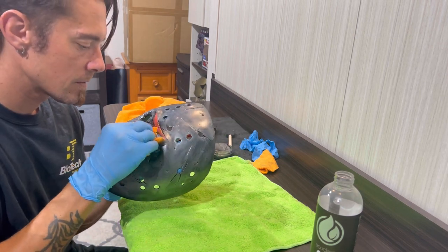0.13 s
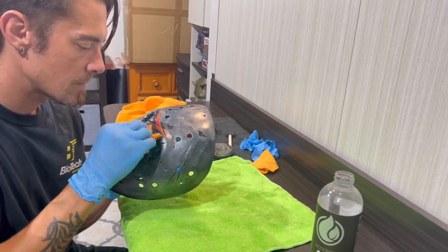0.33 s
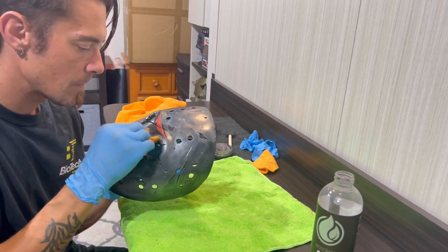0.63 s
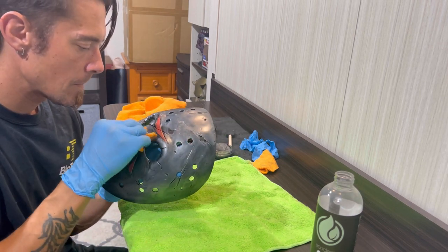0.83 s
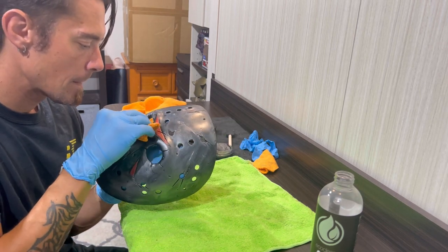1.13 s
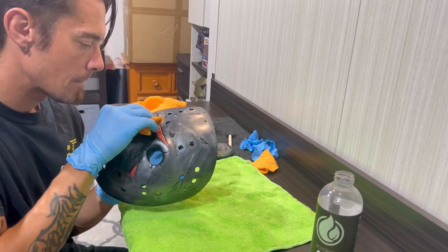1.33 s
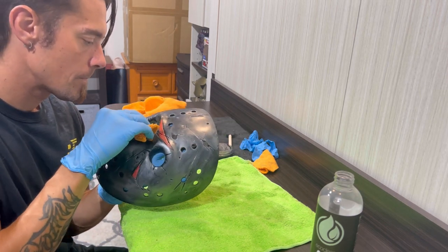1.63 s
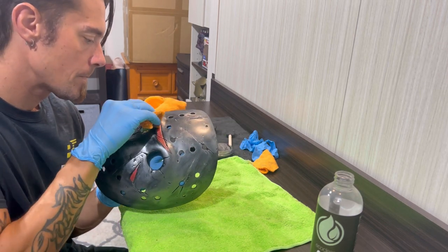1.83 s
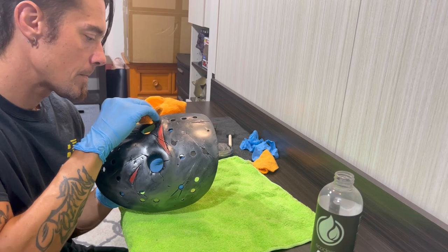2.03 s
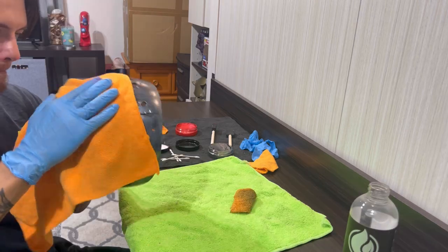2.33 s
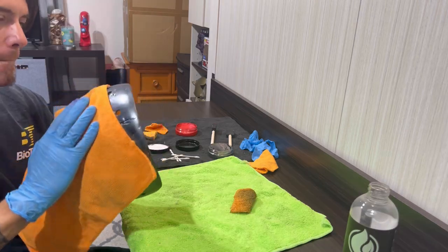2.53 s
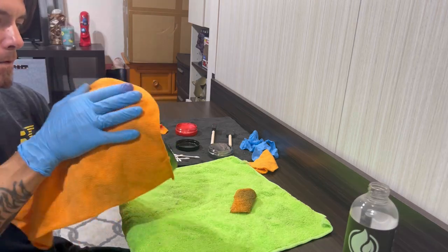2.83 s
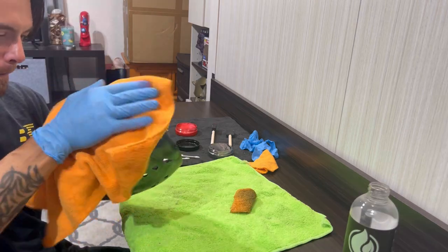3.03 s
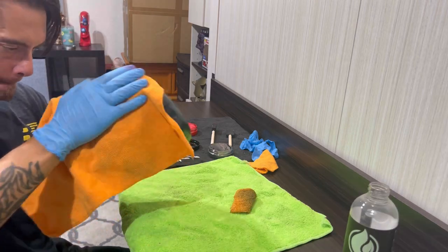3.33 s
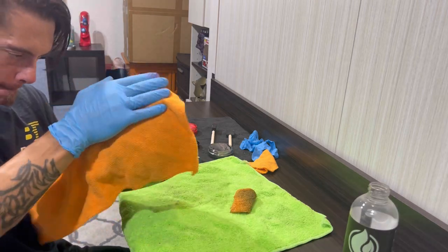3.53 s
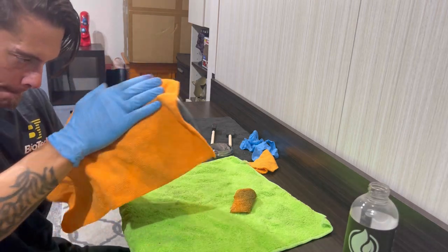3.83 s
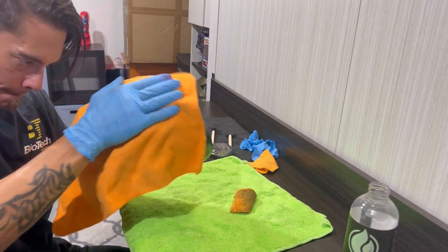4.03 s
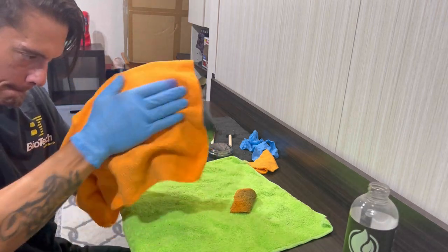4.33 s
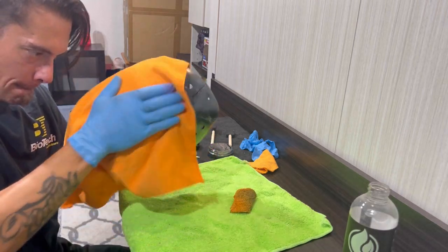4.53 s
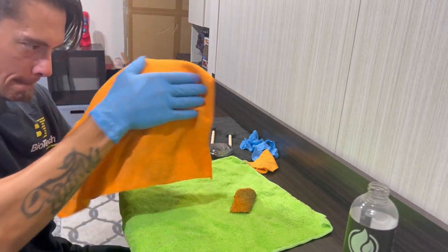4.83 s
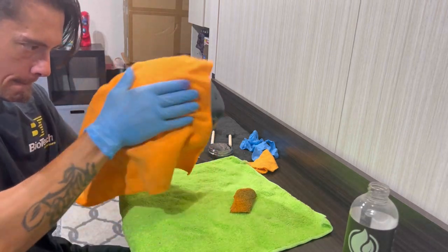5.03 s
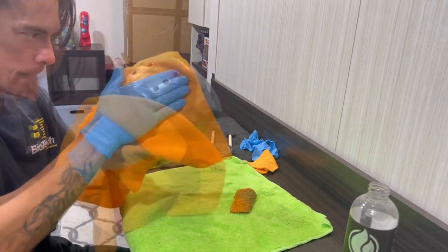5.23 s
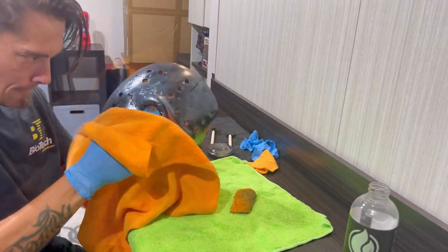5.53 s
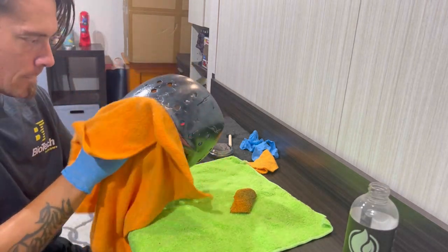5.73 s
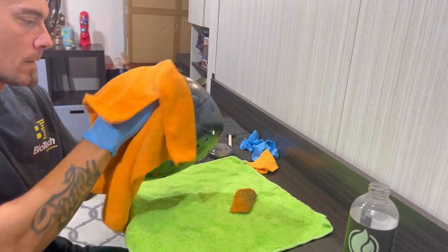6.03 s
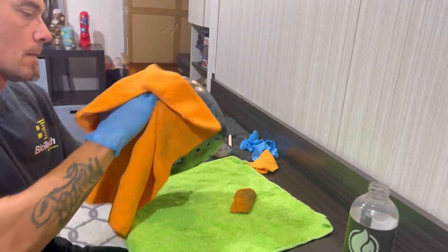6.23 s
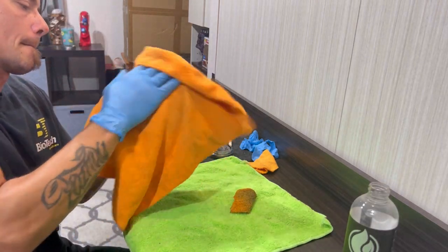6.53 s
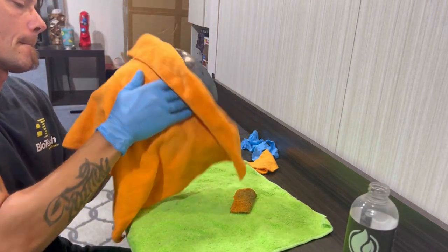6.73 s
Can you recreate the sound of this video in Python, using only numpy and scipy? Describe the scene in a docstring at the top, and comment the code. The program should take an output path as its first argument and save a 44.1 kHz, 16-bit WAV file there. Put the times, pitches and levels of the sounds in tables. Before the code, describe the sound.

In a small room, a rag whispers in quick dabs, then a towel swishes and scrubs a hollow plastic mask that knocks dully in the hand.

```python
"""Polishing a hollow mask

Small room, stereo pair at a table: a gloved hand polishes a plastic mask. Small dabs with a folded rag
come first, then a towel is swept over it and rubbed quickly to and fro. Fibres hiss as filtered grains,
the pressed cloth sticks and slips on the shell, and the mask bumps in the holding hand, ringing its low
modes. Dry ticks and a few wavering chirps stand out. A motor hums and a fan's airy band leans left."""
import sys
import numpy as np
from scipy import signal
from scipy.fft import rfft, irfft
from scipy.io import wavfile

SR = 44100
rng = np.random.default_rng(int(sys.argv[2]) if len(sys.argv) > 2 else 0)


def master(y):
    """Save y as 16-bit WAV."""
    cut = np.clip(np.atleast_2d(y).T, -1, 1)
    pcm = np.round(cut * 32767)  # scale
    wavfile.write(sys.argv[1], SR, pcm.astype(np.int16))


N = 303849
T = np.arange(N) / SR  # s
F = np.maximum(np.arange(N // 2 + 1) * SR / N, 1)  # Hz
SIDES = np.array([[.5], [-.5]])  # left and right microphone, half a difference each


def undb(db):
    """Decibels to gain."""
    return 10 ** (np.asarray(db) / 20)


def unit(x):
    """Scale to rms 1."""
    return x / np.sqrt(np.mean(x ** 2))


def curve(rows, axis=1):
    """One column of a table, joined by straight lines in time."""
    rows = np.array(rows)
    return np.interp(T, rows[:, 0], rows[:, axis])


def across(rows, axis=1):
    """One column of a table, joined by straight lines over log frequency."""
    rows = np.array(rows)
    return np.interp(np.log(F), np.log(rows[:, 0]), rows[:, axis])


def colour(x, response):
    """Filter by a frequency response."""
    return irfft(rfft(x) * response, N)


def walk(rate_hz):
    """Smooth random wandering with spread 1."""
    return unit(colour(rng.standard_normal(N), np.exp(-(F / rate_hz) ** 2)))


def tone(hz, db):
    """A steady tone that wavers slightly; standing waves shift it between the microphones."""
    phase = 2 * np.pi * (hz * T + rng.random())
    phase = phase + .05 * walk(2.5) + .28 * SIDES
    level_db = db + .35 * walk(4.5) - .6 * SIDES
    return np.sqrt(2) * np.sin(phase) * undb(level_db)


MOTOR_HZ = 68.97
# the motor's tone and overtones: [multiple of MOTOR_HZ, rms level/dB before dip and waver]
MOTOR_TONES = [(1, -46), (2, -69.5), (3, -66), (4, -73.5), (5, -78)]
# other steady tones in the room: [f/Hz, rms level/dB before waver]
OTHER_TONES = [(79.9, -58), (120, -66.3), (153.5, -72.5)]
# the bass of the hum dips briefly: [t/s, change of level/dB]; the rumble takes a quarter of it
BASS_DIP = [(0, 1), (4.8, 0.5), (5.0, -3), (5.2, -11), (5.45, -8.5), (5.65, -1), (5.85, 0.5), (6.89, 1)]


def hum():
    """The motor's fundamental beats against a second low tone, under a few overtones."""
    fundamental = tone(MOTOR_HZ, MOTOR_TONES[0][1] + curve(BASS_DIP))
    overtones = sum(tone(k * MOTOR_HZ, db) for k, db in MOTOR_TONES[1:])
    others = sum(tone(hz, db) for hz, db in OTHER_TONES)
    return fundamental + overtones + others


# colour of the room's rumble: [f/Hz, relative level/dB per Hz]
RUMBLE_COLOUR = [(20, -31), (30, -8.5), (42, 7.5), (75, 8.5), (100, 0.5), (150, 1), (220, -6.5), (320, -8),
                 (450, -15.5), (650, -26), (1000, -33.5), (2600, -40.5), (8000, -60.5), (15000, -42)]
# colour of the fan's air: [f/Hz, relative level/dB per Hz]
FAN_COLOUR = [(300, -5), (700, -14), (1000, -0.5), (1300, -11), (1750, 5.5), (2100, 0.5), (2500, -17.5),
              (5500, -19), (6700, -9.5), (7600, -25), (15000, -37)]
# the fan's airy band swells and sinks a little: [t/s, level/dB midway between left and right]
FAN_LEVEL_CURVE = [(0, -77), (2.0, -76), (2.3, -75), (5.3, -78), (6.89, -74)]


def room():
    """Low rumble, much alike at both microphones in the bass, and a fan's airy band from the left."""
    mid, side = colour(rng.standard_normal((2, N)), undb(across(RUMBLE_COLOUR)))
    side = colour(side, np.clip(F / 420, .2, 1))
    rumble_db = -56.2 + .8 * walk(12) - 3.5 * SIDES + .25 * curve(BASS_DIP)
    rumble = unit(mid + 2 * SIDES * side) * undb(rumble_db)
    fan = unit(colour(rng.standard_normal((2, N)), undb(across(FAN_COLOUR))))
    return rumble + fan * undb(curve(FAN_LEVEL_CURVE) + 12.3 * SIDES)


def slips(rate, spread_db):
    """Three trains of tiny stick-slip releases of uneven size, rate per s: one direct, two scattered."""
    hit = rng.random((3, N)) < rate / SR
    signed = hit * rng.standard_normal((3, N))
    return signed * undb(spread_db * np.minimum(rng.exponential(size=(3, N)), 4))


# the mask at the two microphones: [f/Hz, likeness 0-1, left minus right/dB, left leads/rad]
MICROPHONES = [(150, 1, 2, .6), (400, 0.52, 0, -0.4), (1340, 0.27, 1, 1), (2820, 0.15, 2.5, -4),
               (4650, 0.43, 4.5, -1.5), (7200, 0.28, 0.5, -0.34), (10150, 1, 1.5, -3),
               (11330, 1, -0.5, -4.5), (13800, 1, 1.5, -6), (16100, .85, -6.5, -9)]


def ports(x):
    """The direct sound reaches both microphones with a phase lag; the scattered part differs."""
    like = np.clip(across(MICROPHONES), 0, 1)
    direct = np.sqrt(like) * np.exp(1j * SIDES * across(MICROPHONES, axis=3))
    both = colour(x[0], direct) + colour(x[1:], np.sqrt(1 - like))
    return colour(both, undb(SIDES * across(MICROPHONES, axis=2)))


def friction(spectrum, rate, spread_db, patchy_db):
    """Dense slips through a colour; the grip comes and goes in patches."""
    grains = colour(slips(rate, spread_db), undb(across(spectrum)))
    return unit(ports(grains) * undb(patchy_db * walk(80)))


def strokes(times, lengths, levels_db):
    """Each stroke speeds up and slows down; friction power follows speed, length is that at half power."""
    power = np.zeros(N)
    for s, length, db in zip(times, lengths, levels_db):
        span = slice(*np.searchsorted(T, [s - 2 * length, s + 2 * length]))
        power[span] += undb(2 * db) * .5 ** ((2 * (T[span] - s) / length) ** 2)
    return np.sqrt(power)


# no two strokes are alike: scatter of their timing and strength
STROKE_SCATTER_S, STROKE_SCATTER_DB = 0.0024, .5


def to_and_fro(bouts, effort):
    """The hand keeps its pace through a bout, driven by the arm: time, period and level of each stroke."""
    rows = []
    for first, last, count, return_db in bouts:
        times, period = np.linspace(first, last, round(count), retstep=True)
        # outward and return strokes alternate
        rows += [(s, period, return_db * (k % 2 - .5)) for k, s in enumerate(times)]
    times, periods, sway_db = np.transpose(rows)
    late, strong = rng.standard_normal((len(times), 2)).T
    levels_db = np.interp(times, T, curve(effort)) + sway_db + STROKE_SCATTER_DB * strong
    return times + STROKE_SCATTER_S * late, periods, levels_db


# colour of the rag, also of loose folds and air: [f/Hz, relative level/dB per Hz]
RAG_COLOUR = [(1500, -10), (3000, -6), (5000, -8), (8000, -6.5), (12000, 1.5), (14000, -1), (16000, -11.5)]
# colour of pressed cloth on the shell: [f/Hz, relative level/dB per Hz]
DRAG_COLOUR = [(150, 5.5), (400, 5), (620, -3.5), (820, -1), (1100, 1.5), (1700, 4), (2300, 2.5),
               (3200, -3.5), (6000, -9.5), (12000, -26)]
# bouts of dabbing: [first stroke t/s, last stroke t/s, number of strokes, return over outward level/dB]
DAB_BOUTS = [(.022, .938, 11, 3.5), (1.072, 1.28, 3, -5.5), (1.395, 1.595, 3, -3), (1.772, 2.07, 4, -0.5)]
# how briskly the rag moves: [t/s, hiss level/dB before the trim in rag()]
RAG_EFFORT_CURVE = [(0, -72), (.25, -79.5), (.66, -75.5), (1.07, -83.5), (1.28, -86), (1.4, -83),
                    (1.85, -82.5), (1.96, -76.5), (2.1, -76.5)]
# the fingers press the cloth on the shell: [t/s, rub level/dB]
RAG_PRESS_CURVE = [(0, -70), (.9, -79.5), (1.21, -62.5), (1.55, -77.5), (1.88, -69.5), (1.98, -60.5),
                   (2.13, -64), (2.25, -78)]
DAB_SHARE = 0.49  # share of a stroke's period spent near full speed


def rag():
    """Light dabs give a thin hiss, and a soft rub where the finger presses."""
    times, periods, hiss_db = to_and_fro(DAB_BOUTS, RAG_EFFORT_CURVE)
    hiss = friction(RAG_COLOUR, rate=27000, spread_db=.5, patchy_db=1.9)
    hiss = hiss * strokes(times, DAB_SHARE * periods, hiss_db)
    soft = undb(across(DRAG_COLOUR)) / (1 + (F / 1100) ** 4)
    rub = unit(ports(colour(slips(3000, 1.7), soft)))
    return undb(5.5) * hiss + rub * undb(curve(RAG_PRESS_CURVE))


# modes of the hand-damped shell: [f/Hz, width/Hz, level/dB]
SHELL_MODES = [(155, 31, -10.5), (210.5, 72, 0.5), (316.5, 39, -3), (472, 290, -14), (764, 77, -11.5)]


def shell():
    """Response of the mask's low modes, each a damped resonance."""
    return sum(undb(db) / (1 + 1j * (F / hz - hz / F) * hz / width) for hz, width, db in SHELL_MODES)


# the mask bumps in the hand: [t/s, level/dB before the trims in bumps(), judder length/s,
# jerk of the cloth against the bump/dB]
MASK_BUMPS = [(1.216, -54.5, 0.018, -14), (2.119, -47.5, 0.0089, -12), (2.205, -53.5, 0.03, -14),
              (3.159, -48, 0.027, -16), (3.399, -42.5, 0.009, -21), (3.786, -48, 0.019, -24),
              (4.305, -47.5, 0.025, -5), (4.447, -49, 0.055, -22), (4.508, -56, .011, 3),
              (4.576, -45, 0.012, -2), (4.595, -46.5, 0.021, -8), (4.721, -49.5, .024, -16),
              (4.835, -49, 0.018, -14)]
KNOCK_DB, CONTACT_S = 9.5, 0.00067  # knock against the bump's level, half the time of contact
JERK_S, JERK_HZ = .004, 1150  # jerk of the cloth: decay, top of its band


def bumps():
    """Each bump is a soft knock within a short judder; both ring the shell, and the cloth jerks across it."""
    knock, push, jerk = 0, 0, 0
    for s, db, length, jerk_db in MASK_BUMPS:
        knock = knock + undb(db) * np.exp(-np.minimum(((T - s - .003) / CONTACT_S) ** 2, 60))
        age = np.maximum(T - s, 0)
        # the push peaks at half the judder's length
        push = push + undb(db) * 2 * age / length * np.exp(1 - np.minimum(2 * age / length, 60))
        jerk = jerk + undb(db + jerk_db) * (T >= s) * np.exp(-np.minimum(age / JERK_S, 60))
    stick = np.sign(colour(rng.standard_normal((3, N)), 1 / (1 + (F / 900) ** 2)))
    judder = ports(colour(stick * push, shell())) / np.std(colour(stick, shell()))
    scrape = jerk * unit(ports(colour(slips(4500, 1.1), 1 / (1 + (F / JERK_HZ) ** 4))))
    return undb(-5.0) * judder + undb(KNOCK_DB) * colour(knock, shell()) + scrape


# small sharp ticks: [t/s, level/dB before the trim in ticks(), decay/s]
SHARP_TICKS = [(2.138, -61, .001), (2.541, -58, 0.0018), (2.554, -57, 0.0017), (2.648, -41.5, 0.00094)]
# colour of a tick: [f/Hz, relative level/dB per Hz]
TICK_COLOUR = [(200, -4), (800, 0), (2000, -2), (3500, -1), (6500, 2), (9000, -2), (13000, -2.5),
               (16000, -15)]


def ticks():
    """Dry bright ticks, decaying bursts of noise, with a faint tail from the room."""
    ring = 0
    for s, db, decay in SHARP_TICKS:
        age = np.maximum(T - s, 0)
        tail = undb(-21) * np.exp(-age / 0.055)
        ring = ring + undb(db) * (T >= s) * (np.exp(-age / decay) + tail)
    noise = ports(colour(rng.standard_normal((3, N)), undb(across(TICK_COLOUR))))
    return undb(2.5) * ring * unit(noise)


# bouts of rubbing: [first stroke t/s, last stroke t/s, number of strokes, return over outward level/dB]
RUBBING_BOUTS = [(2.703, 3.09, 5, 1.5), (3.16, 4.112, 16, 1.5), (4.182, 5.007, 13, -0.5),
                 (5.092, 5.622, 6, 4.5), (5.762, 6.248, 5, 1), (6.35, 6.772, 5, 0.5)]
# the arm behind the towel: [t/s, hiss level/dB, pressure as drag over hiss/dB], before the trims in towel()
TOWEL_EFFORT_CURVE = [(2.7, -58.5, -2.5), (3.0, -58.5, 0.5), (3.16, -55, -2.5), (3.26, -59, -3),
                      (3.58, -56.5, -2), (3.85, -58.5, .5), (4.15, -58, -0.5), (4.36, -58, -1.5),
                      (4.7, -57.5, -2), (5.0, -62.5, -5.5), (5.1, -61, 1.5), (5.41, -67, 2.5),
                      (5.53, -65.5, -7), (5.63, -68.5, 1.5), (5.76, -63, -4), (6.13, -62, -5),
                      (6.45, -59, -4), (6.57, -58.5, -1.5), (6.77, -63, -2)]
# single swipes, faint to strong: [t/s at full speed, length/s, hiss level/dB, pressure/dB],
# before the same trims
SINGLE_SWIPES = [(2.166, 0.03, -64.5, -3), (2.224, 0.052, -56, -2), (2.447, 0.072, -51, -14.5),
                 (2.544, 0.1, -68.5, 4), (2.604, 0.019, -61.5, -5.5), (2.995, 0.047, -57.5, -5),
                 (4.466, 0.02, -55, -8), (4.942, 0.039, -55.5, -2), (6.85, 0.077, -70, 0.5)]
# share of a stroke's period spent near full speed: fibres, grip, loose folds
WIPE_SHARE, GRIP_SHARE, FOLD_SHARE = 0.66, 0.55, 0.24
# loose folds whisper: level against the fibres, and its fall per dB of pressure
FOLD_DB, FOLD_DB_PER_DB = -9.5, 1.96
# the hanging end trails over the shell: from when, time to settle, level before the hiss trim
TRAIL_S, TRAIL_RISE_S, TRAIL_DB = 2.14, .015, -72.5


def towel_motion():
    """Speed, grip and loose swing of the towel: quick rubbing, a few single swipes, and the trailing end."""
    times, periods, hiss_db = to_and_fro(RUBBING_BOUTS, TOWEL_EFFORT_CURVE)
    press_db = np.interp(times, T, curve(TOWEL_EFFORT_CURVE, axis=2))
    fold_db = hiss_db + FOLD_DB - FOLD_DB_PER_DB * press_db
    speed = strokes(times, WIPE_SHARE * periods, hiss_db)
    grip = strokes(times, GRIP_SHARE * periods, hiss_db + press_db)
    swing = strokes(times, FOLD_SHARE * periods, fold_db)
    times, lengths, hiss_db, press_db = np.transpose(SINGLE_SWIPES)
    speed = np.hypot(speed, strokes(times, lengths, hiss_db))
    grip = np.hypot(grip, strokes(times, lengths, hiss_db + press_db))
    trail = undb(TRAIL_DB) * np.clip((T - TRAIL_S) / TRAIL_RISE_S, 0, 1)
    return np.hypot(speed, trail), grip, swing


# colour of the towel's fibres: [f/Hz, relative level/dB per Hz]
FIBRE_COLOUR = [(700, -22), (2000, -4.5), (3200, -2), (5200, -1.5), (8000, -1.5), (12000, -0.5),
                (14000, -6), (16000, -5.5)]


def towel():
    """Fibres hiss with speed, loose folds whisper; pressure adds a coarser drag and shakes the shell."""
    speed, grip, swing = towel_motion()
    hiss = friction(FIBRE_COLOUR, rate=18000, spread_db=1.5, patchy_db=1.0) * speed
    folds = friction(RAG_COLOUR, rate=18000, spread_db=2.0, patchy_db=4.5) * swing
    drag = friction(DRAG_COLOUR, rate=4500, spread_db=1.5, patchy_db=1.5) * grip
    # only firm strokes couple well into the shell
    coupling = (grip / grip.max()) ** 0.38
    body = unit(ports(colour(slips(900, 2.3), shell()))) * grip * coupling
    return undb(0.42) * hiss + folds + undb(-0.75) * drag + undb(1.5) * body


# the long sweep that spreads the towel: [t/s, swish level/dB, swish reference f/Hz before ratio and waver]
SWEEP_CURVE = [(2.27, -120, 1413), (2.31, -78, 1393), (2.36, -61, 1450), (2.4, -55.5, 1500),
               (2.45, -56.5, 1706), (2.555, -56.3, 1750), (2.58, -72, 1750), (2.66, -120, 1750)]


def sweep():
    """The towel slides across the hollow shell: a grainy swish wanders and rises in pitch under an airy top."""
    swish = 0
    for ratio, width_hz, db in [(.97, 300, -1), (1.25, 330, -4.5), (1.6, 360, -7.5)]:
        pitch = ratio * curve(SWEEP_CURVE, axis=2) * (1 + .04 * walk(24.68))
        turn = 2 * np.pi * np.cumsum(pitch) / SR
        band = unit(ports(colour(slips(2500, 1.5), 1 / (1 + (F / width_hz) ** 3))))
        # the carrier lifts the low band of grains up to the swish's pitch
        swish = swish + undb(db) * band * np.cos(turn + np.array([[0], [np.pi / 2]]))
    swish = unit(swish) * undb(0.9 * walk(70) + 0.96 * SIDES)
    air = friction(RAG_COLOUR, rate=12000, spread_db=2.5, patchy_db=2.5)
    return (swish + undb(-4.5) * air) * undb(curve(SWEEP_CURVE))


# the towel catches and chirps: [t/s, length/s, rms level/dB at the peak, f/Hz before waver]
TOWEL_CHIRPS = [(4.748, 0.048, -68, 1550), (4.867, .014, -70, 1560), (4.946, .014, -62, 2250),
                (5.168, 0.0072, -60.5, 1380)]
CHIRP_WAVER = .09  # share of the pitch


def chirps():
    """For a moment the slips fall into step and the towel gives a wavering chirp, a sine."""
    times, lengths, levels_db, pitches = np.transpose(TOWEL_CHIRPS)
    # the pitch changes halfway between chirps
    pitch = pitches[np.searchsorted((times[1:] + times[:-1]) / 2, T)]
    turn = 2 * np.pi * np.cumsum(pitch * (1 + CHIRP_WAVER * walk(320))) / SR
    return np.sqrt(2) * np.sin(turn + SIDES) * strokes(times, lengths, levels_db)


# early echoes from the table and the wall: [delay t/s, level/dB]
EARLY_ECHOES = [(.0034, -33), (.0071, -16)]


def near(x):
    """Table and wall add early echoes, on paths about 1.2 and 2.4 m longer than the direct one."""
    echoes = sum(undb(db) * np.exp(-2j * np.pi * F * delay) for delay, db in EARLY_ECHOES)
    return colour(x, 1 + echoes)


def scene():
    """The polishing over the sound of the room."""
    cloth = near(rag() + towel() + chirps() + sweep() + ticks())
    return cloth + bumps() + hum() + room()


def record(dry):
    """The treble has a hollow near 10 kHz and a steep top; the ends fade within milliseconds."""
    fade = np.clip(np.minimum(T, T[-1] - T) / .008, 0, 1)
    hollow_db = -22 * np.exp(-np.abs((F - 10100) / 900) ** 3)
    steep_top = signal.ellip(10, .2, 70, 15750, fs=SR, output="sos")  # low-pass, edge in Hz
    return signal.sosfilt(steep_top, colour(dry * fade, undb(hollow_db)))


dry = scene()
out = record(dry)
master(out)
```